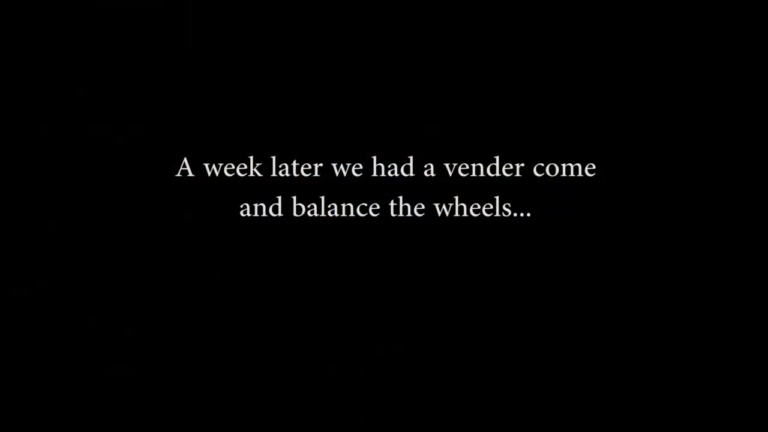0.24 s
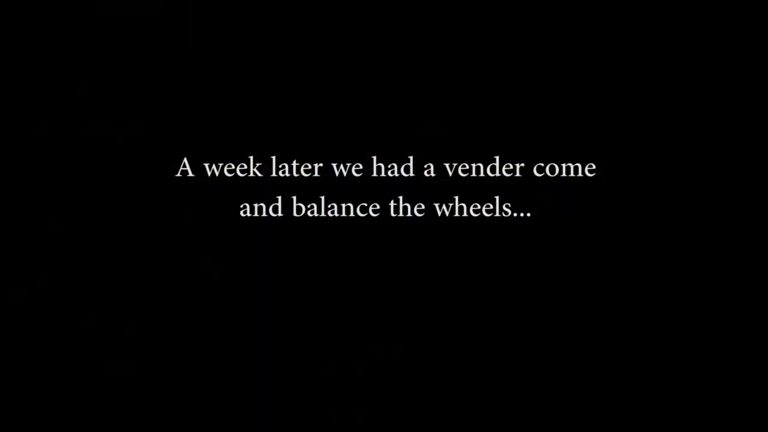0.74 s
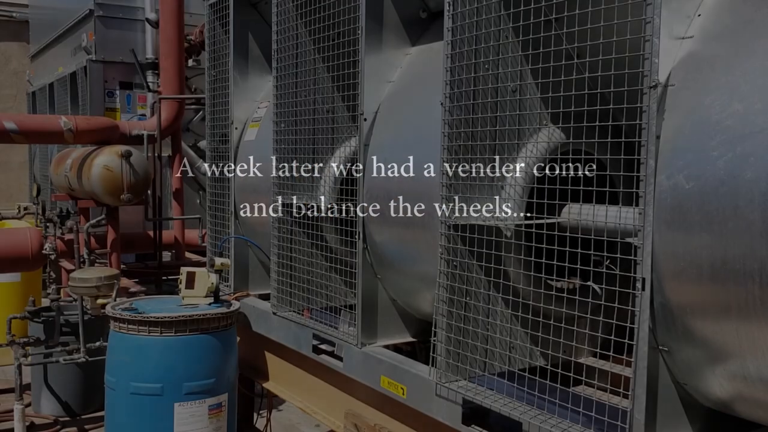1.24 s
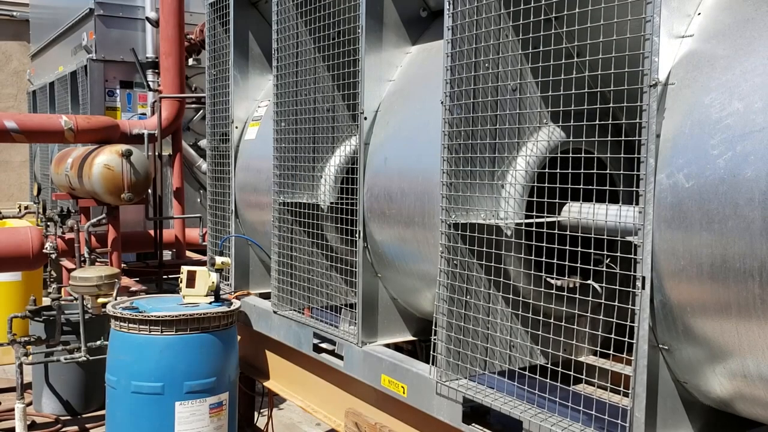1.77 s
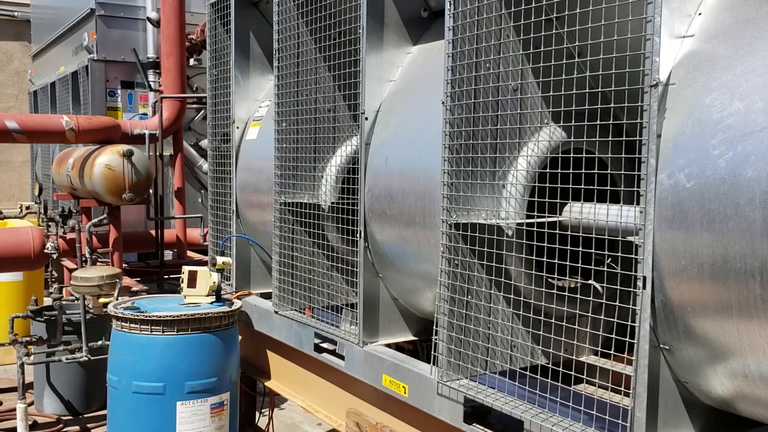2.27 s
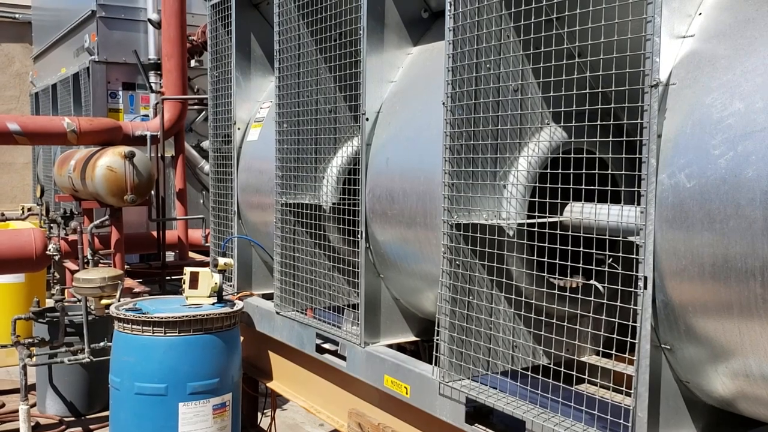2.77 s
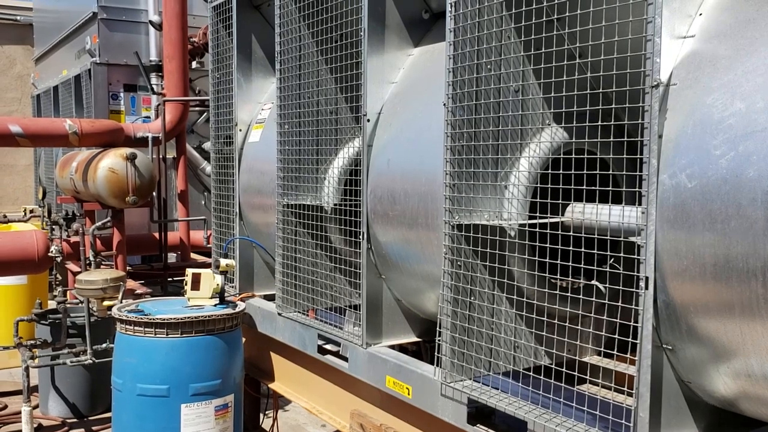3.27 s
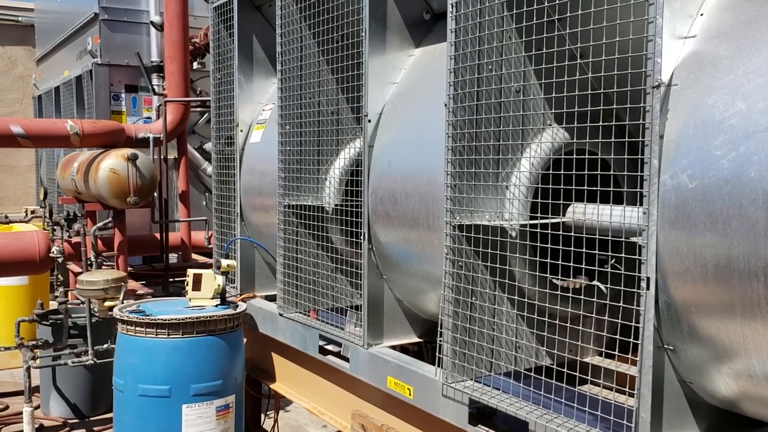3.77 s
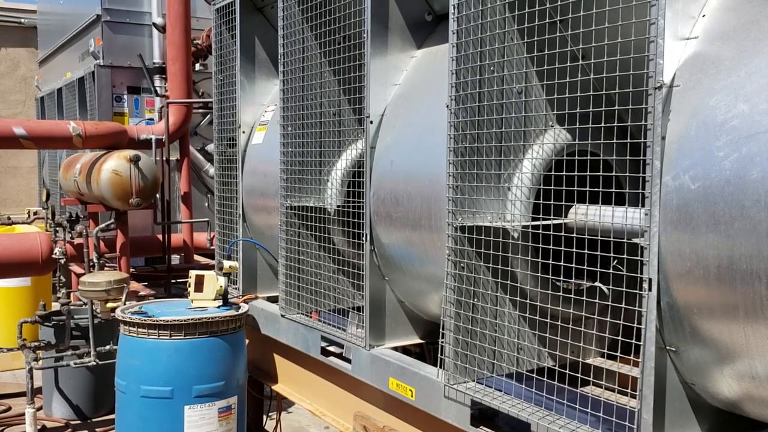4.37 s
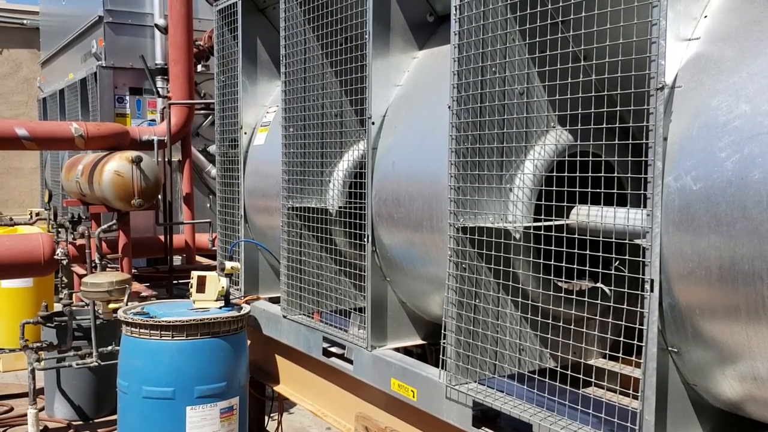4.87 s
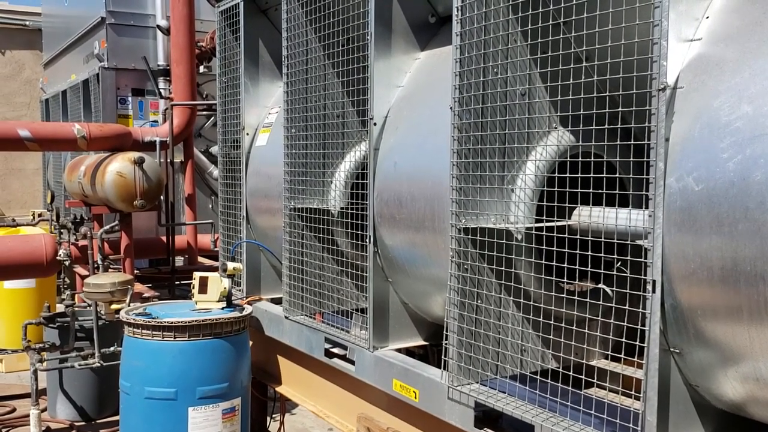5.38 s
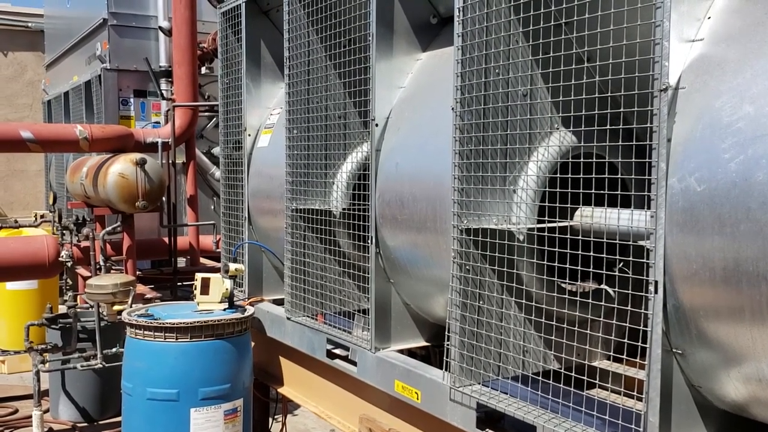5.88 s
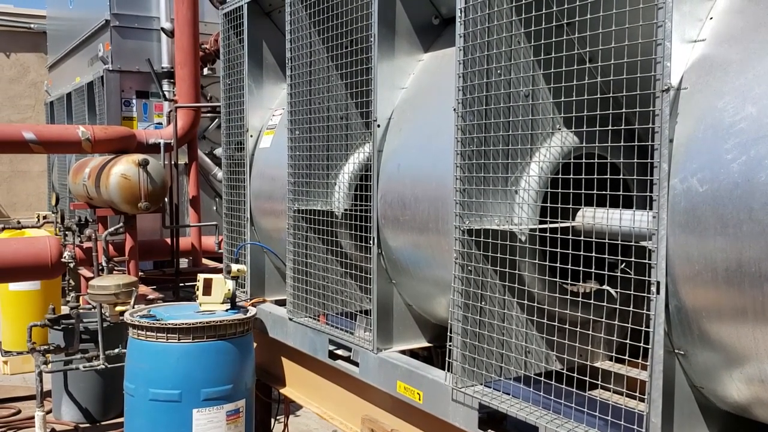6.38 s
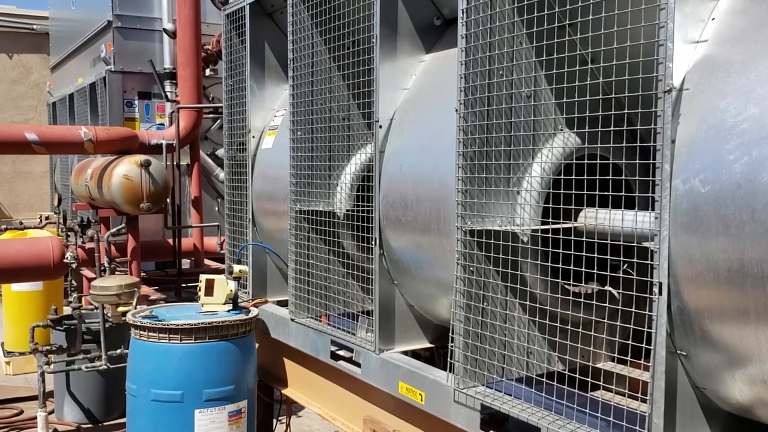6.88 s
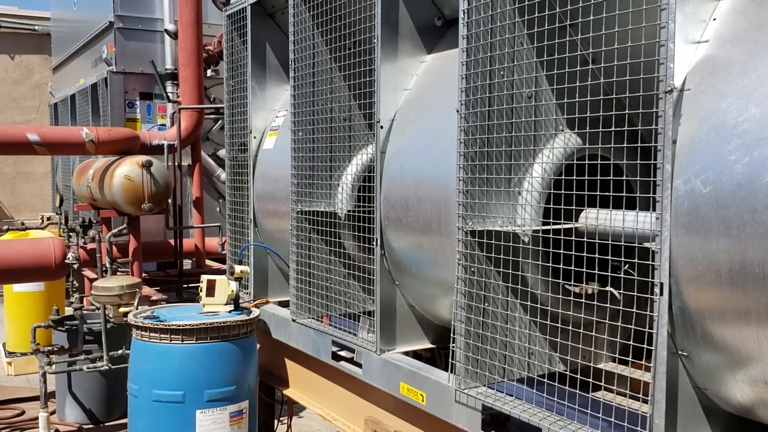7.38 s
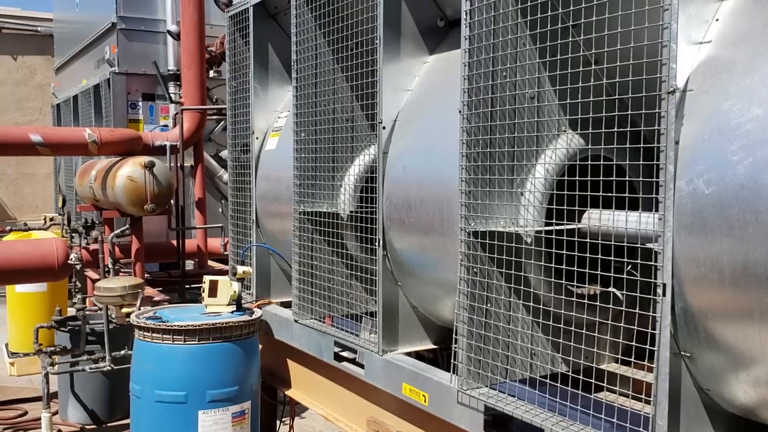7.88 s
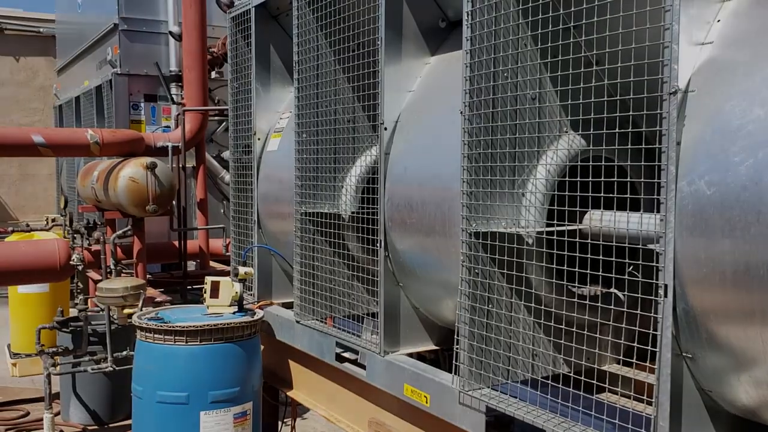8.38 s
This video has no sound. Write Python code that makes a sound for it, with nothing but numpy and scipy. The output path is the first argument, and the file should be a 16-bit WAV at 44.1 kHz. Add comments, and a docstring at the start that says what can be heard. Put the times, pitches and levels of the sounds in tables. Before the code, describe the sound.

Close outdoor stereo sound of industrial fans: silence first, then a quick swell to constant deep housing roar, airy hiss through mesh and a steady shrill drive whine near four kilohertz, wavering gently as the microphone drifts. Other thin hums sit underneath. Short low wind bumps hit mainly the left side early on, pause, then return more heavily with dull pops. It begins fading as it ends.

```python
"""A short silence opens by a fade-in onto large blower wheels running steadily behind mesh guards on a
rooftop, heard from close by with a hand-held stereo microphone in light wind. Turbulent air, shaped noise,
rumbles in the housings and hisses through the mesh. A variable-speed drive makes the motor whine, a stack
of sines at its switching rate with side tones set by the supply frequency, over thin tones from nearby.
Gusts buffet the left microphone port with lumpy low noise and single pops; the level sags at the end."""
import sys
import numpy as np
from scipy import signal
from scipy.fft import rfft, irfft, next_fast_len
from scipy.io import wavfile

SR = 44100
rng = np.random.default_rng(int(sys.argv[2]) if len(sys.argv) > 2 else 0)


def digitize_waveform(pressure):
    """Quantize a signal to 16-bit integers and store it at the path in sys.argv[1].

    Rows of a 2-D input are taken as channels; values are limited to [-1, 1].
    """
    field = np.atleast_2d(pressure).T
    bounded = np.clip(field, -1, 1)
    quanta = np.round(bounded * 32767).astype(np.int16)
    wavfile.write(sys.argv[1], SR, quanta)


def convert_level_to_amplitude(level_db):
    """Map a level in decibels to its linear amplitude factor."""
    exponent = np.asarray(level_db, float) / 20
    return 10 ** exponent


N = 380583
STEP = 100  # samples between values of a coarse curve

# Housing rumble and inlet roar, before resonances and swells: freq_hz, left_db_per_hz, right_db_per_hz
ROAR = [(22, -71.8, -72.3), (32, -64, -64), (42, -44, -42.5), (56, -41.5, -42.5), (113.5, -45.5, -46),
        (204, -51, -51), (281, -57, -57), (402, -58, -59), (530, -60, -64.5), (746, -62, -62),
        (950, -61.5, -66), (1230, -61, -64.0)]
# Air through blades and mesh, likewise: freq_hz, left_db_per_hz, right_db_per_hz
RUSH = [(1300, -61.9, -64.0), (1955, -64.5, -65), (2790, -71.5, -69.5), (3800, -71.5, -72.5),
        (3930, -73, -69.5), (4650, -74, -75.5), (5500, -72.5, -81.5), (6760, -74.5, -78.5),
        (7700, -75.5, -74), (8560, -81, -79.5), (9950, -77, -76.5), (11640, -70.5, -66.5),
        (12500, -73, -69), (14000, -70.3, -67.5), (15300, -72, -71)]
# Resonances that lift the air noise: freq_hz, width_hz, left_lift_db, right_lift_db
RESONANCES = [(194.4, 12, 1.5, 2), (363, 11, 1, 2.5), (407, 31, 0.5, -1), (4040, 170, 0.5, 2.5),
              (7520, 300, 3, 0.5), (11960, 250, .5, 1)]
# The microphone pair: freq_hz, left_right_likeness_0_to_1, right_lead_rad
MIC_PAIR = [(42, 1.0, 0.12), (110, 0.98, 0.04), (220.0, 0.85, 0.04), (330.0, 0.68, 0.23),
            (420.0, 0.36, -0.19), (520.0, 0.55, 0.3), (700.0, 0.61, 0.68), (900.0, 0.3, 1.23),
            (1100.0, 0.24, 2.31), (1400.0, 0.29, 2.55), (1700.0, 0.04, 2.84), (2000.0, 0.22, 0.71),
            (2500.0, 0.15, 0.04), (3200.0, 0.06, -0.1)]
# Output of the fans as it reaches the microphone: time_s, level_db
AIRFLOW = [(1.4, -.5), (1.9, 0.43), (6.0, 0.37), (6.6, 0.07), (8.4, -0.24)]
SURGE_DB, SURGES_HZ, RUMBLE_UNDER_RUSH_DB = 0.4, 1.5, -0.73  # the rumble also surges slowly on its own

# Drive switching, supply and rotor slot rates; wheel and rotor turns
SWITCH_HZ, SUPPLY_HZ, SLOT_HZ = 3999.52, 56.08, 1222.2
WHEEL_HZ, ROTOR_HZ = SUPPLY_HZ / 6, SUPPLY_HZ / 2
# Motor tones as whole multiples of three rates: switch_count, slot_count, supply_count
WHINE_ORDERS = [(1, 0, k) for k in (-9, -7, -5, -3, -2, -1, 0, 1, 2, 3, 5, 7)] + [(1, 1, k) for k in (-5, -3, -1, 1, 3)] + [(2, 0, k) for k in (-2, 0, 2)] + [(3, 0, k) for k in (-5, -3, 3, 5)] + [(0, 1, 0)]
# Motor whine before flutter, throb and standing waves, a row per order: left_db, right_db, right_lead_rad
WHINE = [(-69.3, -59.9, 2.9), (-65.0, -62.3, -1.9), (-56.4, -57.1, 0.5), (-58.3, -61.5, 2.1),
         (-56.8, -52.6, -2.0), (-48.5, -35.8, -1.3), (-55.6, -67.7, -1.2), (-41.0, -45.5, -0.4),
         (-69.9, -58.5, -3.0), (-47.9, -48.7, -0.3), (-52.2, -53.9, -2.4), (-57.1, -56.4, 2.8),
         (-61.3, -71.4, -1.7), (-54.5, -52.0, 1.7), (-59.2, -71.8, 0.5), (-56.9, -70.9, 1.5),
         (-50.9, -69.3, 0.2), (-60.5, -58.2, -0.9), (-59.3, -62.6, 3.1), (-66.7, -67.6, -1.3),
         (-58.0, -48.0, -1.4), (-54.6, -51.3, -0.3), (-57.3, -55.2, -0.1), (-52.6, -50.9, 2.1),
         (-44.2, -45.3, 0.7)]
# The held microphone drifts through the standing waves of the motor tones: time_s, position_cm
SWAY = [(1.15, -0.49), (2.3, -1.14), (3.3, -0.064), (4.0, -0.88), (4.8, 0.05), (6.0, 0.75), (6.95, 2.2),
        (7.6, 0.67), (8.4, 0.63)]
# Tones that stand between motor and guards: switch_count, slot_count, supply_count
STANDING_ORDERS = [(1, 0, -1), (1, 0, 1), (1, 1, -3), (0, 1, 0)]
# A row for each of them: left_swing_db, left_loudest_cm, right_swing_db, right_loudest_cm
STANDING = [(7, 1.1, 1.2, -.5), (3.0, .4, 6, -0.8), (5, .1, 4.5, 0.2), (3, -3.5, 2.5, -3)]

# Other thin tones, likely nearby motors and pumps, before flutter: pitch_hz, left_db, right_db, right_lead_rad
NEARBY_TONES = [(403.7, -42.0, -50.1, -0.5), (1204.5, -44.9, -56.1, 1.9), (1304.1, -62.7, -50.2, 0.4),
                (2944.7, -63.7, -55.9, 1.1), (3431.9, -56.2, -68.1, 1.8), (5204.3, -56.7, -64.9, -2.7),
                (5832.8, -59.2, -71.0, -0.3), (5920.3, -57.8, -65.2, -0.6)]

# Gusts on the left microphone port: start_s, length_s, level_db
GUSTS = [(1.0, .12, -27), (1.33, .2, -26), (1.74, 0.13, -27), (2.18, .14, -31), (5.82, .12, -30),
         (6.0, 0.57, -25.5), (6.69, 0.11, -25), (6.878, .08, -25), (7.423, 0.45, -25.5), (8.54, .2, -28)]
GUST_RISE_DB_PER_S, GUST_FALL_DB_PER_S, CALM_DB = 160, 130, -50
# Relative colour of the wind noise: freq_hz, level_db_per_hz
WIND_COLOUR = [(20, -24), (42, -3), (60, 2), (85, -2.5), (130, -3), (200, -16.5), (320, -21), (600, -47),
               (1500, -70)]
# The upper part of the wind gains or loses this share of each dB above or below a strong gust
BRIGHT_ABOVE_HZ, STRONG_GUST_DB, DULLING_SHARE = 120, -26.5, .8
# The strongest eddies that pop on the left port: time_s, peak_db
STRONG_POPS = [(6.037, -8), (6.798, -15), (6.885, -12), (7.849, -14), (8.579, -11)]
# Smaller pops come by chance, at a level that follows the gusts
POPS_PER_S, POP_OVER_GUST_DB, POP_SPREAD_DB = 6.0, 6, 2.5

FADE_START_S, FADE_ZERO_S, FADE_FULL_S = .817, 0.81, 1.706
FADE_OUT_S, FADE_OUT_DB = 8.3, -2


def rms_one(x):
    """Scale to unit rms."""
    return x / np.sqrt(np.mean(x ** 2) + 1e-20)


def in_time(rows):
    """Table columns read at every sample, straight lines between the times."""
    s, *columns = np.transpose(rows)
    return np.array([np.interp(np.arange(N) / SR, s, c) for c in columns])


def at_hz(rows, hz):
    """Table columns read on a log-frequency axis."""
    f, *columns = np.transpose(rows)
    return np.array([np.interp(np.log(hz), np.log(f), c) for c in columns])


def coarse_drift(rate_hz):
    """Slow chance of unit rms, one value every STEP samples: noise through a double one-pole lowpass."""
    r = np.exp(-2 * np.pi * rate_hz * STEP / SR)
    noise = rng.standard_normal(N // STEP + 2002)
    slow = signal.lfilter([1], [1, -2 * r, r * r], noise)[2000:]  # drop the filter's run-in
    return rms_one(slow - slow.mean())


def spread(coarse):
    """Coarse values read at every sample."""
    return np.interp(np.arange(N) / STEP, np.arange(len(coarse)), coarse)


def drift(rate_hz):
    """Slow chance at every sample."""
    return spread(coarse_drift(rate_hz))


def air(swell_db, eddy_db):
    """Stereo turbulence in octave bands; all share one random swell and each has eddies of its own."""
    size = next_fast_len(N)
    hz = np.maximum(np.arange(size // 2 + 1) * SR / size, 1)
    colour = convert_level_to_amplitude(at_hz(ROAR + RUSH[1:], hz)) * np.sqrt(SR / 2)  # the first rush row is left out
    for centre, width, *lift_db in RESONANCES:
        bell = 1 / (1 + (2 * (hz - centre) / width) ** 2)
        colour = colour * convert_level_to_amplitude(np.outer(lift_db, bell))
    colour[:, (hz < 15) | (hz > 15740)] = 0

    # Noise common to both ears, mixed with noise of each ear's own
    alike, lead = at_hz(MIC_PAIR, hz)
    alike = np.clip(alike, 0, 1)
    shared, left, right = rfft(rng.standard_normal((3, size)))
    common = np.sqrt(alike) * shared * np.exp([-.5j * lead, .5j * lead])
    ears = common + np.sqrt(1 - alike) * np.array([left, right])

    rush_db, = in_time(AIRFLOW)
    rumble_db = rush_db + SURGE_DB * drift(SURGES_HZ) + RUMBLE_UNDER_RUSH_DB
    swell, out = drift(3.7), 0
    place = np.clip(np.log2(hz / 45), 0, 8)  # octaves above 45 Hz
    for octave in range(9):
        share = np.clip(1 - abs(place - octave), 0, 1)  # overlapping triangles sum to one
        low = max(0, 1 - octave / 3.8)  # the rumble's say fades out upwards
        gain_db = low * rumble_db + (1 - low) * rush_db + swell_db * swell + eddy_db * drift(3.4)
        out = out + convert_level_to_amplitude(gain_db) * irfft(ears * colour * share, size)[:, :N]
    return out


def tone(hz, left_db, right_db, lead, waver_hz, flutter_db):
    """A sine whose pitch follows a coarse waver and whose level flutters on its own at each ear."""
    turns = spread(np.cumsum(hz + waver_hz) * STEP / SR) % 1
    phase = 2 * np.pi * turns + rng.normal(0, .3)
    level = [spread(convert_level_to_amplitude(level_db + flutter_db * coarse_drift(2.9))) for level_db in (left_db, right_db)]
    return np.sqrt(2) * np.array(level) * np.sin(phase + np.array([[-lead / 2], [lead / 2]]))


def standing(orders, hz, cm):
    """Gain at each ear: the level swings once for every half wavelength that the microphone moves."""
    swings = dict(zip(STANDING_ORDERS, STANDING))
    left_db, left_cm, right_db, right_cm = swings.get(orders, (0, 0, 0, 0))
    rad_per_cm = 4 * np.pi * hz / 34300  # speed of sound in cm/s
    return [spread(convert_level_to_amplitude(swing_db * np.cos(rad_per_cm * (cm - loudest_cm))))
            for swing_db, loudest_cm in ((left_db, left_cm), (right_db, right_cm))]


def motor_whine():
    """Switching tones with supply side tones, and the rotor slot tone; wheel and rotor turns throb them."""
    s, cm = np.arange(N) / SR, in_time(SWAY)[0, ::STEP]
    lower, upper = 0, 0
    clock, slip = coarse_drift(1.5), coarse_drift(1.4)
    for orders, (left_db, right_db, lead) in zip(WHINE_ORDERS, WHINE):
        switch, slot, supply = orders
        hz = switch * SWITCH_HZ + slot * SLOT_HZ + supply * SUPPLY_HZ
        waver_hz = .06 * switch * clock + .4 * slot * slip  # the drive clock is steady, the rotor slips
        line = tone(hz, left_db, right_db, lead, waver_hz, flutter_db=.7 * (switch + slot))
        line = line * standing(orders, hz, cm)
        if supply <= 0:
            lower = lower + line
        else:
            upper = upper + line
    wheel = np.sin(2 * np.pi * WHEEL_HZ * s)
    rotor = np.sin(2 * np.pi * ROTOR_HZ * s)
    return lower * (1 + .08 * wheel + .05 * rotor) + upper * (1 + .2 * wheel + .1 * rotor)


def nearby_hum():
    """Thin tones with a looser pitch and a level that comes and goes."""
    return sum(tone(*row, waver_hz=0.89 * coarse_drift(1.47), flutter_db=2.0) for row in NEARBY_TONES)


def gust_level():
    """Each gust climbs out of the calm, holds and dies away, in dB."""
    s = np.arange(N) / SR
    shapes = []
    for start, length, level_db in GUSTS:
        rise_db = GUST_RISE_DB_PER_S * np.maximum(start - s, 0)
        fall_db = GUST_FALL_DB_PER_S * np.maximum(s - start - length, 0)
        shapes.append(level_db - rise_db - fall_db)
    return np.maximum(np.max(shapes, axis=0), CALM_DB)


def wind(gust_db, lumpy_db, right_db):
    """Lumpy low eddy noise at the left port, brighter in strong gusts; the sheltered right has a little."""
    size = next_fast_len(N)
    hz = np.maximum(np.arange(size // 2 + 1) * SR / size, 1)
    eddies = rfft(rng.standard_normal((2, size))) * convert_level_to_amplitude(at_hz(WIND_COLOUR, hz))
    low_share = 1 / (1 + (hz / BRIGHT_ABOVE_HZ) ** 4)
    low, high = (irfft(eddies * share, size)[:, :N] for share in (low_share, 1 - low_share))
    lumps = convert_level_to_amplitude(lumpy_db * np.array([drift(9.4), drift(10.0)]))
    noise = low + high * convert_level_to_amplitude(DULLING_SHARE * (gust_db - STRONG_GUST_DB))
    unit = np.std((low + high) * lumps)
    return noise * lumps / unit * convert_level_to_amplitude(gust_db + [[0], [right_db]])


def pops(gust_db, shortest_s, longest_s):
    """Each eddy sucks at the left port once, with a weaker push before and after."""
    out, around = np.zeros((2, N + 1400)), np.arange(1400)  # 700 samples to spare at each end
    at = np.flatnonzero(rng.random(N) < POPS_PER_S / SR)
    small_db = gust_db[at] + POP_OVER_GUST_DB + POP_SPREAD_DB * rng.standard_normal(len(at))
    for s, peak_db in list(STRONG_POPS) + list(zip(at / SR, small_db)):
        u = (around - 700) / SR / rng.uniform(shortest_s, longest_s)
        out[0, round(s * SR) + around] -= convert_level_to_amplitude(peak_db) * (1 - u ** 2) * np.exp(-u ** 2 / 2)
    return out[:, 700:N + 700]


def scene():
    """Air, motor, neighbours and wind together."""
    blowers = air(swell_db=0.27, eddy_db=0.33) + motor_whine() + nearby_hum()
    gust_db = gust_level()
    gusts = wind(gust_db, lumpy_db=3.0, right_db=-10)
    gusts = gusts + pops(gust_db, shortest_s=0.00154, longest_s=0.0027)
    return blowers + gusts


def top_cut(x):
    """Nothing passes above the cut-off."""
    return signal.sosfilt(signal.butter(12, 15740, fs=SR, output="sos"), x)


def record(dry):
    """A quarter-sine fade in from silence, and the start of a fade out."""
    s = np.arange(N) / SR
    rise = np.sin(np.pi / 2 * np.clip((s - FADE_ZERO_S) / (FADE_FULL_S - FADE_ZERO_S), 0, 1))
    rise = rise * np.clip((s - FADE_START_S) / .003, 0, 1)  # the first moment opens within 3 ms
    fall = convert_level_to_amplitude(FADE_OUT_DB * np.clip((s - FADE_OUT_S) / (s[-1] - FADE_OUT_S), 0, 1) ** 2)
    return top_cut(dry * rise * fall)


dry = scene()
out = record(dry)
digitize_waveform(out)
```